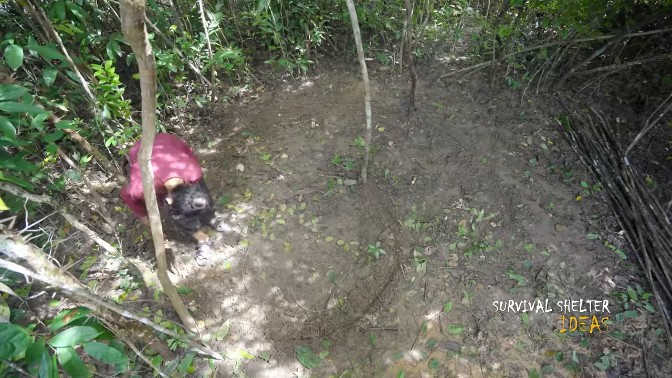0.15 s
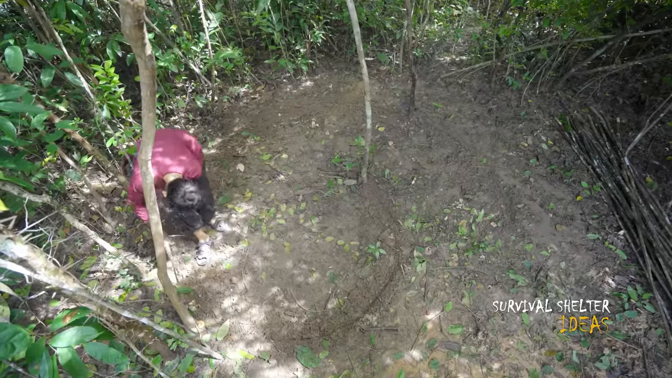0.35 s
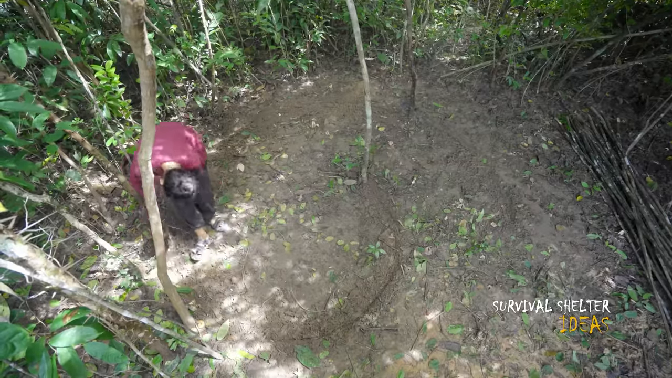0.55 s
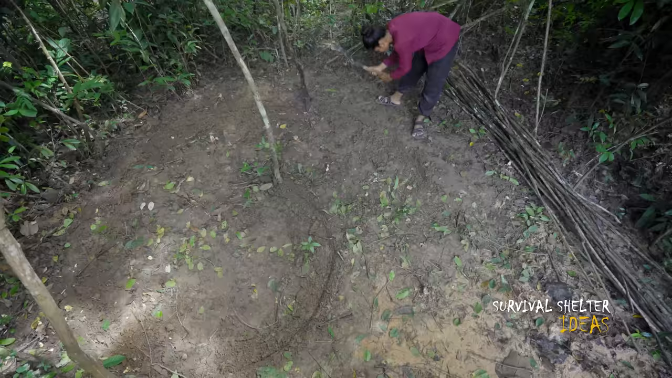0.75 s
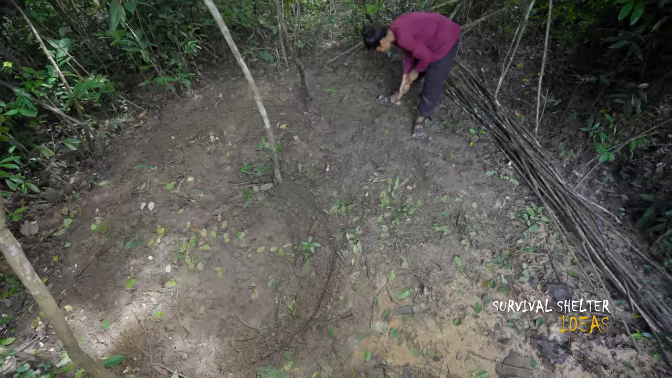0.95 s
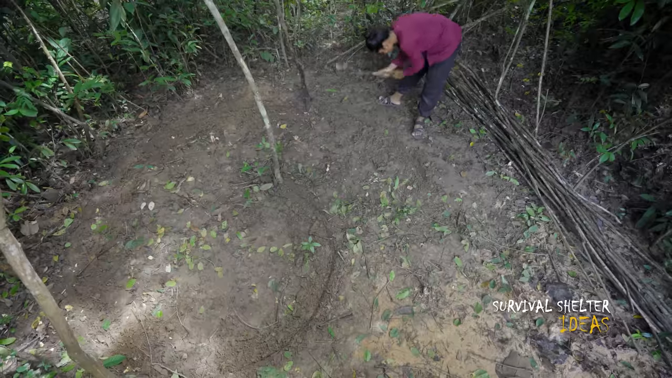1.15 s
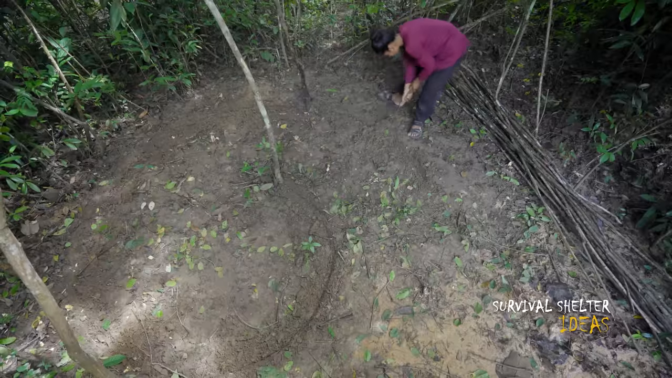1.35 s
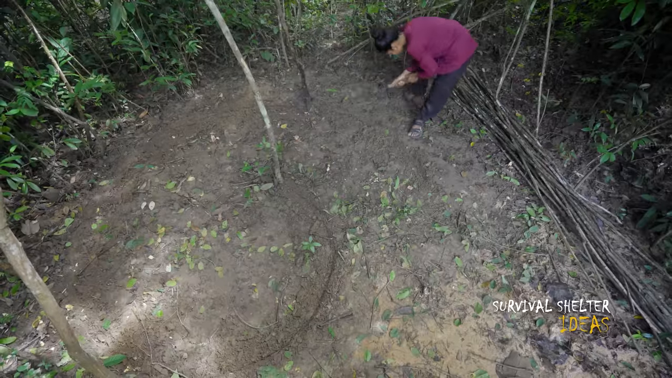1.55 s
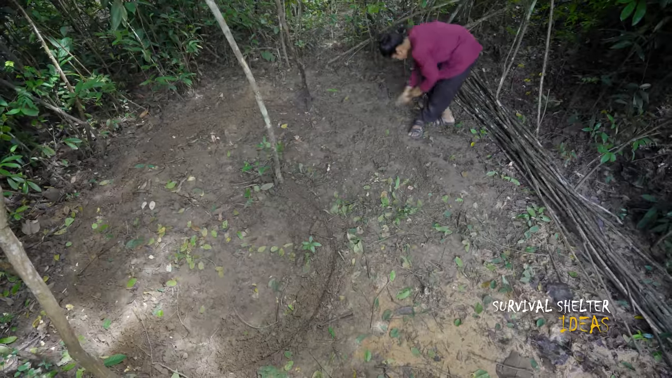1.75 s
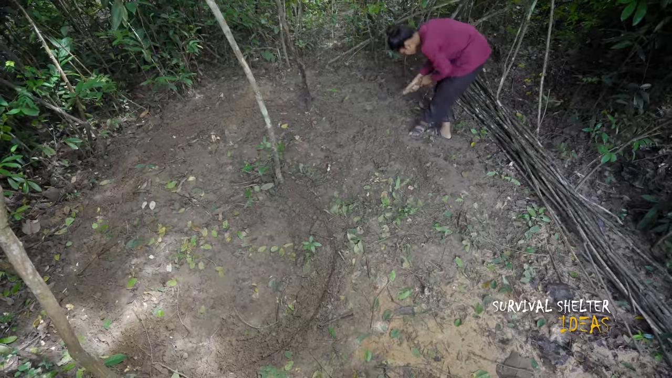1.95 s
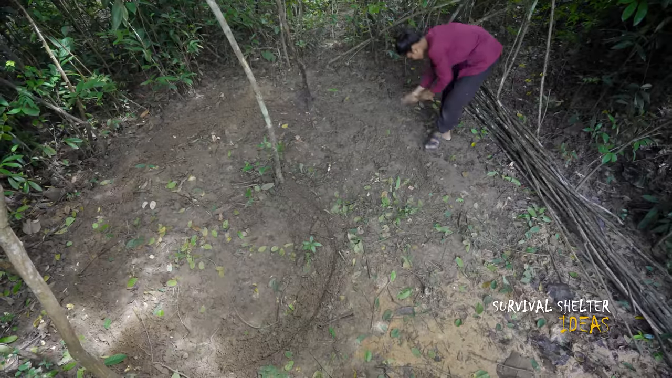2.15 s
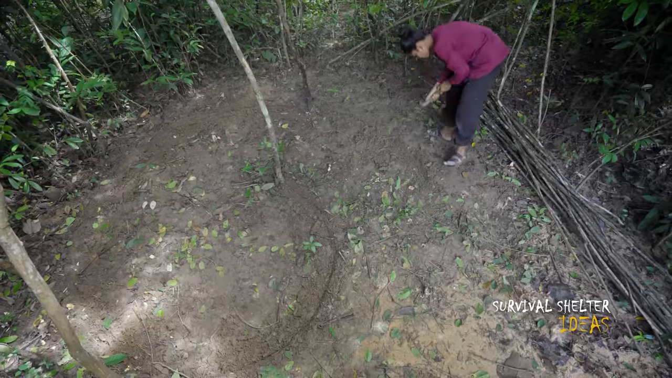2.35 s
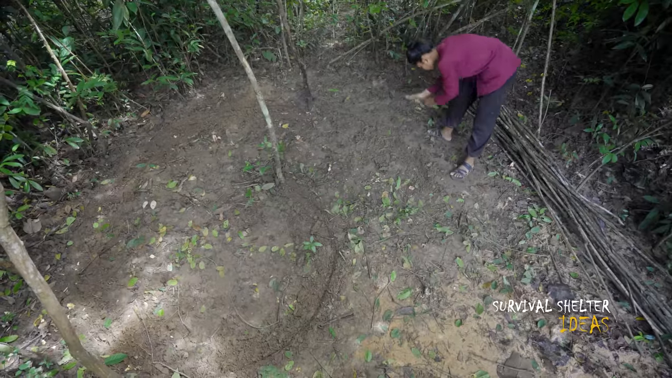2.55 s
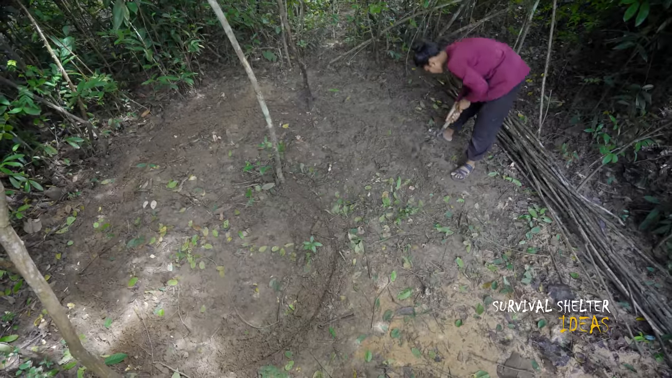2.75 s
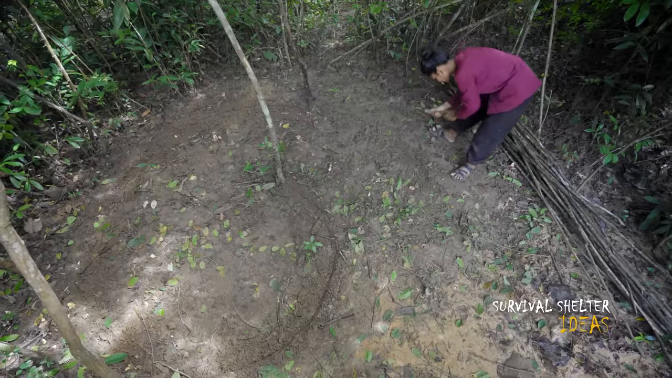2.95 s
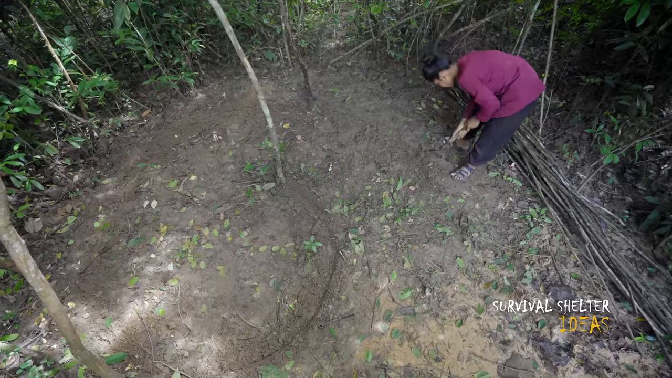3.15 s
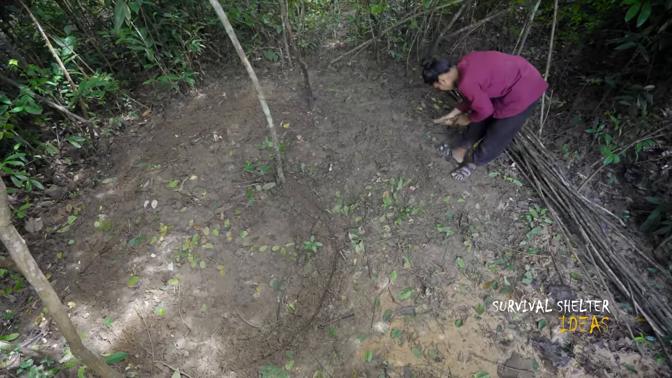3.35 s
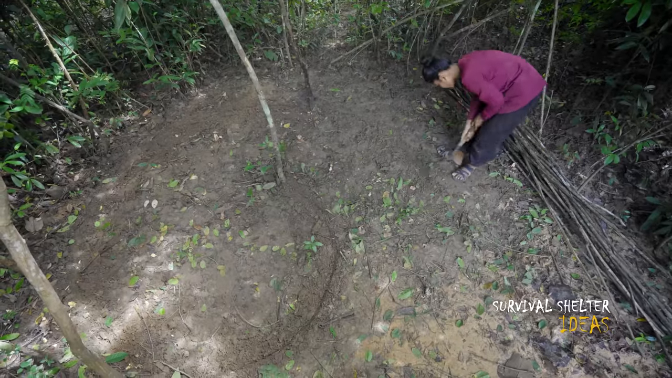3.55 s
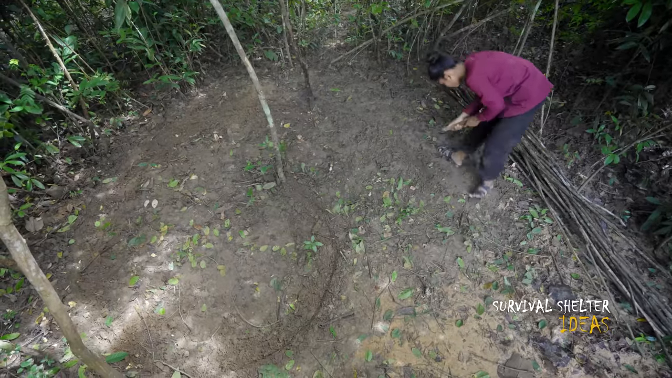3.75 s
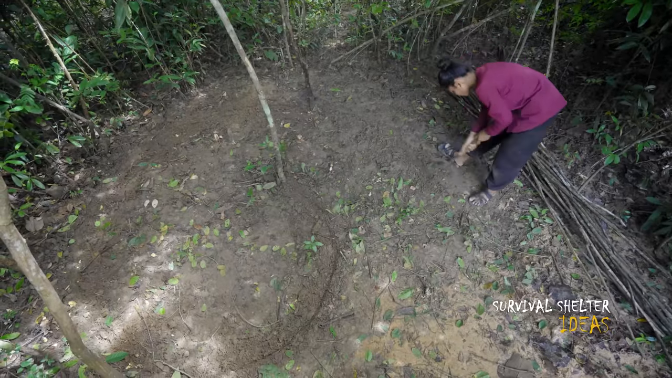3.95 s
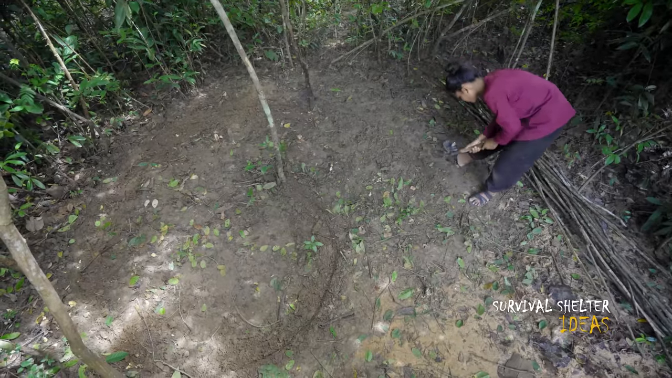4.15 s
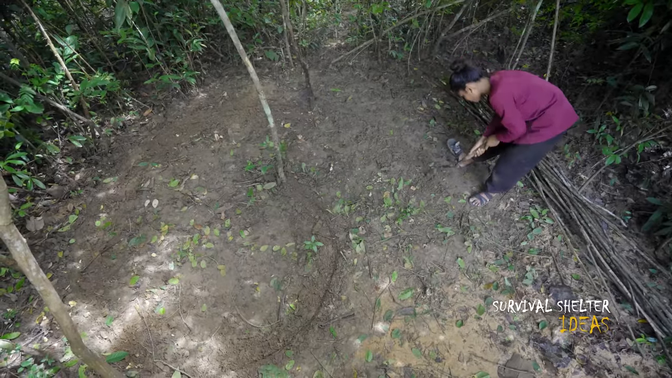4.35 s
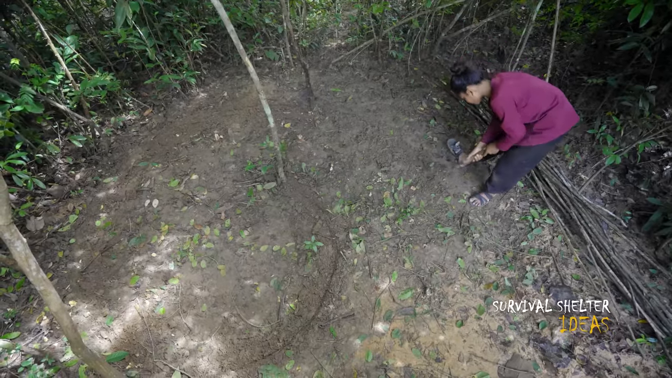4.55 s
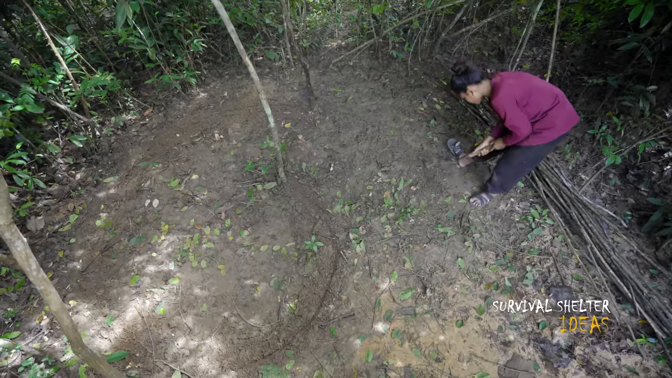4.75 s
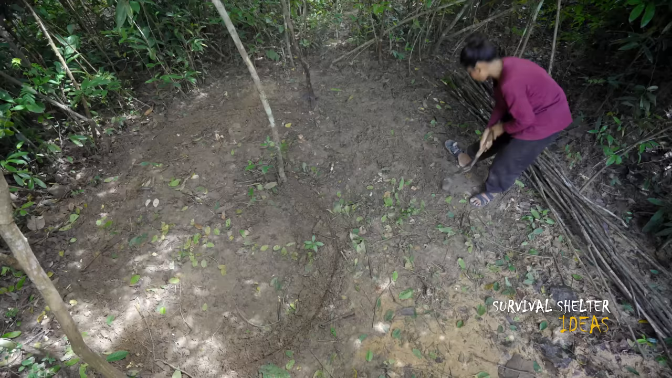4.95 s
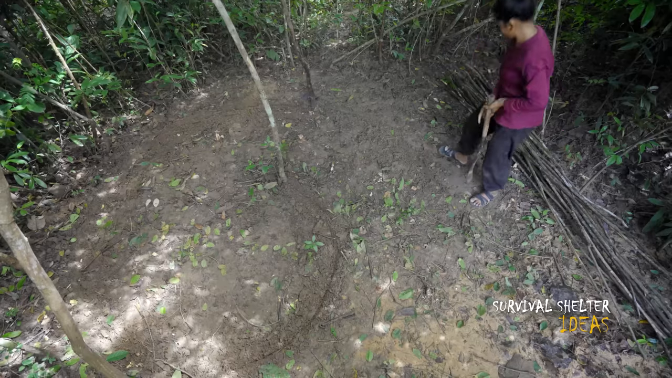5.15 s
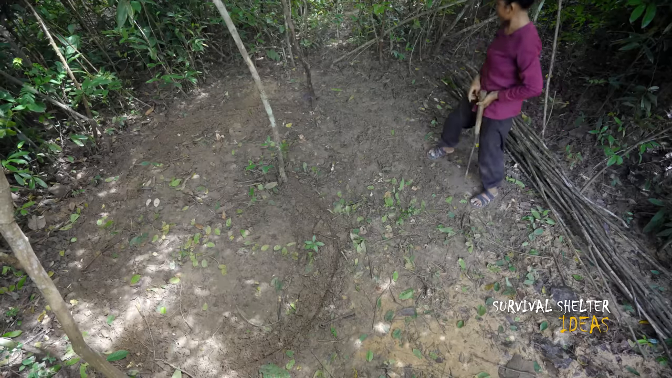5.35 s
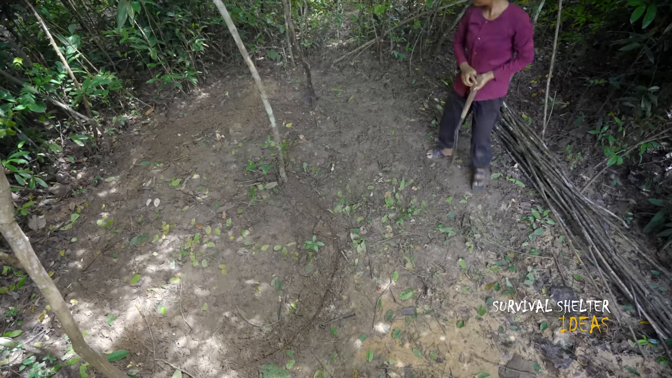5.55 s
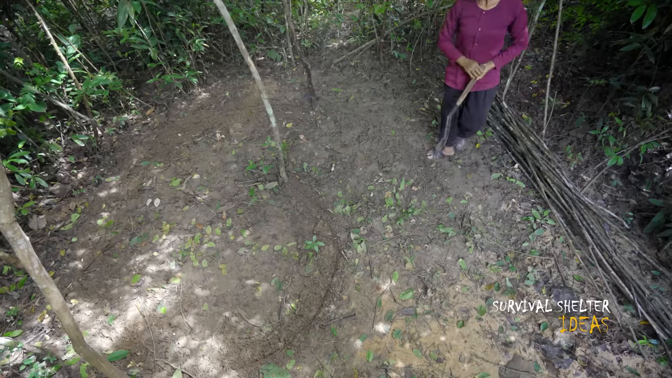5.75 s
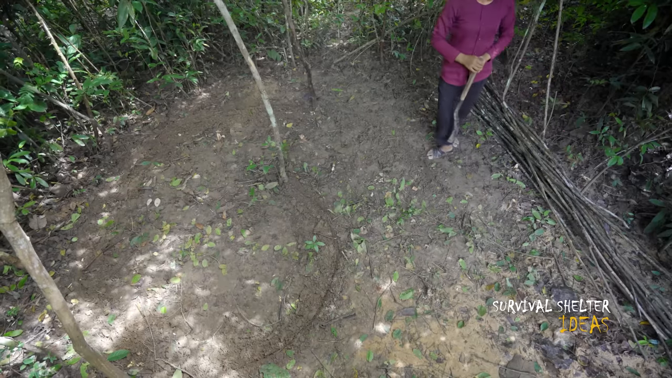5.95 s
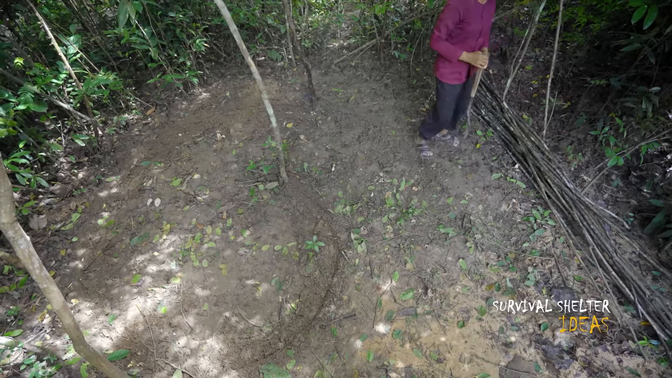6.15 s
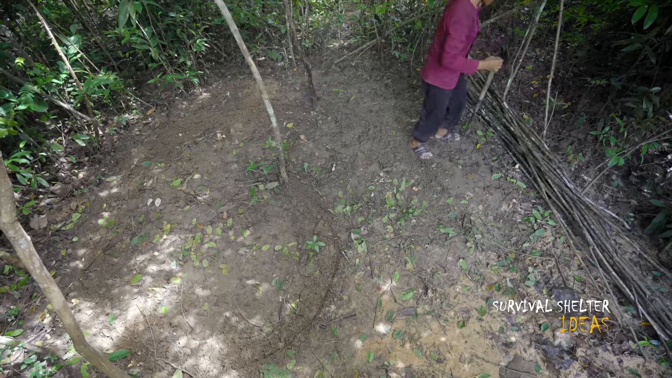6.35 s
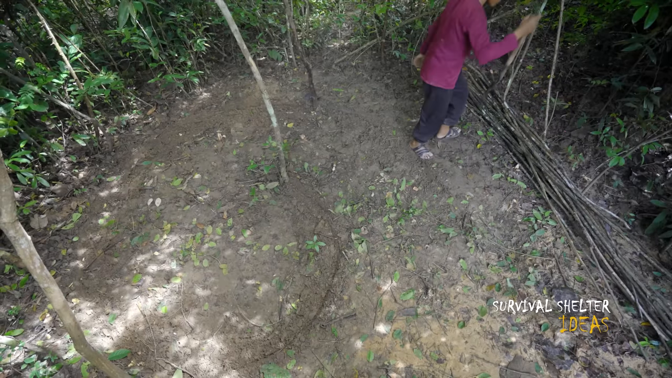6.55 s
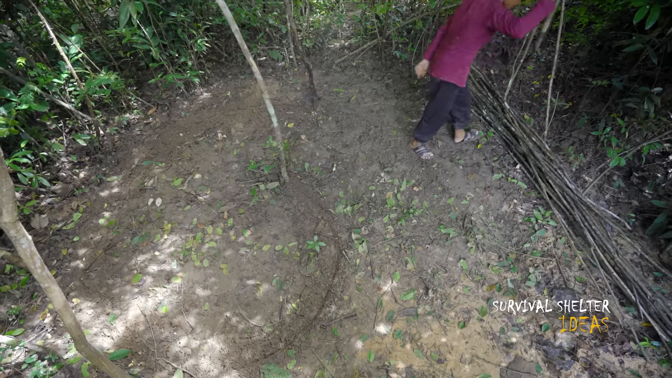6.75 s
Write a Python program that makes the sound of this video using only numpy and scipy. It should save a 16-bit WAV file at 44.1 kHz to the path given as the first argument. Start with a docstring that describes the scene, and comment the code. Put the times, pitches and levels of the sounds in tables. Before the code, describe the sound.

In a forest clearing, a shrill cicada drone near 5.6 kHz swells about five times a second over soft airy hiss and very faint low rumble. At 0.06 s a blade bites dry soil with a cluster of hard stony cracks, slightly left; a softer gritty chop follows at 0.5 s. The hiss drops abruptly just after 0.8 s. From 0.95 to 3.6 s chops land roughly every 0.44 s, each a short crunch of grit and pushed earth, many with dry knocks or brief rings from stones and roots, followed by pattering crumbs. Around 4.0 and 4.4 s the strokes are lighter, then only faint scrapes at 4.65 and 4.93 s. Small leaf and soil rustles occur near 5.4 and 6.5 s, farther left. Trees return a short bright tail; cicadas continue to the end at 6.8 s.

```python
"""In a forest clearing, a machete chops dry soil about twice a second, then more and more lightly.
Each chop is noise for crushed grit, pushed earth and a dull thud; stones and roots crack and ring.
Soil, crumbs and clods patter in shaped noise, and a bright tail of fading noise answers from the trees.
Cicadas are noise near 5.6 kHz, swelling about five times a second over a steady drone.
Beneath are a faint rumble and a forest hiss that drops abruptly after 0.8 s."""
import sys
import numpy as np
from scipy import signal
from scipy.fft import rfft, irfft, next_fast_len
from scipy.io import wavfile
from scipy.ndimage import map_coordinates

SR = 44100
rng = np.random.default_rng(int(sys.argv[2]) if len(sys.argv) > 2 else 0)


def transcribe(signal):
    """Save signal, clipped to [-1, 1], as a 16-bit WAV file at the path in sys.argv[1]."""
    frames = np.atleast_2d(signal).T
    limited = np.clip(frames, -1, 1)
    pcm = np.round(limited * 32767).astype(np.int16)
    wavfile.write(sys.argv[1], SR, pcm)


N = 300762  # length of the scene in samples


def amp(db):
    """Turn decibels into a gain."""
    return 10 ** (np.asarray(db) / 20)


def unit(x):
    """Scale a signal to rms 1."""
    return x / np.sqrt(np.mean(x ** 2) + 1e-20)


def along(points, hz):
    """Read a curve of (Hz, value) points on a logarithmic pitch axis."""
    point_hz, value = np.transpose(points)
    return np.interp(np.log(hz + 1), np.log(point_hz + 1), value)


def over_time(points, s):
    """Read a curve of (seconds, value) points."""
    return np.interp(s, *np.transpose(points))


def wobble(rate, size):
    """Draw a smooth random curve with `rate` random points a second."""
    knots = rng.standard_normal(int(size * rate / SR) + 4)
    return map_coordinates(knots, [np.arange(size) * rate / SR])


def filtered(x, response):
    """Multiply the spectrum of x by a response that depends on frequency."""
    n = x.shape[-1]
    padded = next_fast_len(n + 8192)
    hz = np.fft.rfftfreq(padded, 1 / SR)
    return irfft(rfft(x, padded) * response(hz), padded)[..., :n]


def causal(gain):
    """Give these gains the minimum-phase response, which never sounds before its cause."""
    cepstrum = irfft(np.log(np.maximum(gain, 1e-6)))
    half = len(cepstrum) // 2
    folded = np.r_[cepstrum[0], 2 * cepstrum[1:half], np.zeros(half)]
    return np.exp(rfft(folded))


def noise(spectrum, alike, size):
    """Make stereo noise of rms 1 with a given colour and left-right likeness."""
    def colour(hz):
        turn = np.arccos(np.clip(along(alike, hz), -1, 1)) / 2
        return amp(along(spectrum, hz)) * [np.cos(turn), np.sin(turn)]

    mid, side = filtered(rng.standard_normal((2, size)), colour)
    return unit(np.array([mid + side, mid - side]))


def add(track, s, sound, pan_db):
    """Place a stereo sound at a time; the nearer side is louder and a little earlier."""
    gains = unit(amp([pan_db / 2, -pan_db / 2]))
    left_lag = int(np.clip(np.round(-pan_db / 4), -3, 2))  # samples
    for channel, delay in enumerate((left_lag, 0)):
        start = max(round(s * SR) + delay, 0)
        part = track[channel, start:][:sound.shape[1]]
        part += gains[channel] * sound[channel, :len(part)]


def swell(middle, length):
    """Draw a bell-shaped gain whose power halves length / 2 seconds from its middle."""
    return 2 ** (-2 * ((np.arange(N) / SR - middle) / length) ** 2)


def small(x, corner_hz=300):
    """Thin out the bass, because small things radiate little of it."""
    return signal.sosfilt(signal.butter(2, corner_hz, "high", fs=SR, output="sos"), x)


# where the worker is heard from: time_s, left_minus_right_db
WORKER_PLACE = [(0.1, 5), (0.55, 3), (0.95, -4), (1.4, -4.5), (4.4, -7), (6.82, -8)]


def place(s):
    """Give how much louder the worker is on the left than on the right, in dB."""
    return over_time(WORKER_PLACE, s)


# how loud the forest hiss is: time_s, level_db
HISS_LEVEL = [(0, -41), (0.815, -39.5), (0.835, -49.5), (1.35, -46.5), (1.7, -45.5), (2.5, -44.5),
              (3.3, -43), (4.3, -45), (4.9, -44.5), (5.5, -42.5), (6.82, -43)]
# colour of the hiss: pitch_hz, relative_level_db_per_hz
HISS_COLOUR = [(150, -16.5), (330, -6.5), (500, -10.5), (720, 2), (950, -1), (1400, 2), (2500, 1.5),
               (4500, -0.5), (7500, -3.5), (11000, -6), (13000, -9), (15800, -10.5)]
# colour of the low rumble: pitch_hz, relative_level_db_per_hz
RUMBLE_COLOUR = [(20, -18), (35, -8.5), (60, 3), (80, -0.5), (100, -6), (150, -2), (250, -13), (500, -15),
                 (1500, -30)]
# how alike left and right are for the far sounds: pitch_hz, likeness_0_to_1
FAR_LIKENESS = [(100, 1), (300, 0.89), (700, 0.33), (1400, 0.53), (3100, 0.19), (6800, 0), (15000, 0)]


def forest(rumble_db=-61, pan_db=-1.0):
    """Hiss of the surroundings, noise with a slow level curve, over a faint low rumble."""
    level_db = over_time(HISS_LEVEL, np.arange(N) / SR)
    breeze_db = .4 * wobble(8, size=N)
    hiss = amp(level_db + breeze_db) * noise(HISS_COLOUR, FAR_LIKENESS, size=N)
    rumble = amp(rumble_db) * noise(RUMBLE_COLOUR, FAR_LIKENESS, size=N)
    return hiss * amp([[pan_db / 2], [-pan_db / 2]]) + rumble


# runs of evenly paced cicada swells; two runs overlap where a second cicada joins in:
# first_swell_s, end_s, period_s, level_db (before call_db), swell_length_s
CICADA_RUNS = [(0.213, 0.9, .195, -40.5, .08), (1.081, 1.66, .118, -42, .06), (1.768, 3.1, .207, -39, .09),
               (3.279, 5.06, .213, -38.5, .065), (3.391, 4.25, .2, -40.5, .06),
               (5.153, 6.8, .1875, -38.5, .06)]


def cicada_effort(scatter_db=.7, scatter_s=.005):
    """Evenly paced swells, each a little different in time and strength, add up in power."""
    power = np.zeros(N)
    for first, end, period, db, length in CICADA_RUNS:
        for s in np.arange(first, end, period):
            late, strong = rng.standard_normal(2)
            gain = amp(db + scatter_db * strong)
            power += (gain * swell(s + scatter_s * late, length)) ** 2
    return np.sqrt(power)


# colour of the calling cicadas, before their pitch moves: pitch_hz, relative_level_db_per_hz
CALL_COLOUR = [(3500, -59), (4850, -29), (5200, 0.5), (5600, 8.5), (5950, 5.5), (6350, -2), (7200, -27),
               (10000, -55)]
# colour of the other cicadas: pitch_hz, relative_level_db_per_hz
CHORUS_COLOUR = [(3500, -73), (4900, -6.5), (5400, 5), (5800, 5.5), (6200, -7), (6600, -6.5), (8000, -37)]
# how loud the other, distant cicadas are: time_s, level_db
CHORUS_LEVEL = [(0, -44), (0.8, -46), (1.5, -46.5), (2.6, -55), (3.5, -47), (4.4, -47), (5.3, -44),
                (6.82, -44.5)]


def cicadas(call_db=0.5, sag_hz=260, pan_db=-1.3):
    """One cicada, at times joined by a second, calls in rasping swells, blurred by distance, over a drone."""
    effort = cicada_effort()
    rasp = unit(amp(1.5 * wobble(400, size=N)))
    shift_hz = sag_hz * (1 - unit(effort))  # the pitch sags in each swell, as the abdomen stretches
    # the analytic signal lets a turning phase slide the whole spectrum up or down
    song = signal.hilbert(noise(CALL_COLOUR, FAR_LIKENESS, size=N), next_fast_len(N))[:, :N]
    song = np.real(song * np.exp(2j * np.pi * np.cumsum(shift_hz) / SR))
    callers = amp(call_db) * effort * rasp * song
    chorus_db = over_time(CHORUS_LEVEL, np.arange(N) / SR)
    others = amp(chorus_db) * noise(CHORUS_COLOUR, FAR_LIKENESS, size=N)
    return (callers + others) * amp([[pan_db / 2], [-pan_db / 2]])


# hands and feet shifting soil and dry leaves: middle_s, length_s, level_db
SHIFTS = [(2.092, 0.054, -37.5), (3.12, 0.14, -42.5), (3.279, 0.042, -39), (3.477, 0.029, -42),
          (4.355, 0.02, -36), (5.357, 0.066, -40.5), (5.548, 0.069, -51), (5.673, 0.032, -50),
          (6.47, 0.054, -38.5)]
# colour of crumbs and dry leaves: pitch_hz, relative_level_db_per_hz
LITTER_COLOUR = [(300, -14), (900, -4.5), (2500, 5), (6000, 3.5), (10000, 2.5), (15800, 2)]
# how alike left and right are for the near sounds: pitch_hz, likeness_0_to_1
NEAR_LIKENESS = [(200, 1), (1500, 0.92), (4000, 0.46), (8000, 0.68), (15000, 0.32)]
SPILL_DELAY_S, SPILL_LENGTH_S = 0.074, 0.093  # loosened soil slides off the blade after each chop
STIR_DB = -55  # middle level of the faint stirring of the litter all through


def rustles(crumb_db=5, pan_share=0.89, stir_swing_db=3, clump_db=3.5):
    """Crumbs and dry leaves tick densely under hand, blade and feet: noise in tiny random bursts."""
    spills = [(s + SPILL_DELAY_S, SPILL_LENGTH_S, db) for s, *_, db in CHOP_STROKES]
    stir = amp(STIR_DB + stir_swing_db * np.tanh(wobble(10, size=N)))
    moves = sum((amp(db) * swell(s, length)) ** 2 for s, length, db in SHIFTS + spills)
    motion = np.sqrt(stir ** 2 + moves)
    fine_db = crumb_db * wobble(1200, size=N)
    coarse_db = clump_db * np.tanh(wobble(70, size=N))
    crumbs = unit(amp(fine_db + coarse_db))
    pan_db = pan_share * place(np.arange(N) / SR)
    sides = unit(amp([pan_db / 2, -pan_db / 2]))
    return motion * crumbs * noise(LITTER_COLOUR, NEAR_LIKENESS, size=N) * sides


# hard contacts with stones and roots: start_s, level_db (as 3 ms of sound at that rms),
# note_hz of the thing struck, spread_octaves around it, ring_db of that note against the blow
HARD_CONTACTS = [(0.057, -19, 1920, 1.5, -1.5), (0.0712, -16, 1820, 1.4, 0.5),
                 (0.084, -20.5, 3030, .9, -19), (0.968, -23.5, 1575, 0.81, -8.5),
                 (0.979, -23, 2120, 1.1, -4), (1.135, -35.5, 3500, .55, -9), (1.238, -39, 2200, 1.1, -8),
                 (1.404, -28, 3870, 0.2, 9), (1.410, -24, 1434, 1.2, -3), (1.421, -20, 8850, 1.8, -6),
                 (1.864, -19, 3950, 1.7, -5), (1.957, -33, 4400, 0.65, -5), (2.287, -24, 1450, 1.7, -2),
                 (2.293, -19, 1344, 1.9, -3), (2.724, -18, 1550, 1.35, -18), (2.747, -16, 2590, 0.91, -1.5),
                 (2.752, -20.5, 7400, 1, -9), (3.161, -22.5, 3950, 1.4, -12),
                 (3.585, -17.5, 1250, 3.2, -10), (3.668, -32, 1850, 0.9, -7),
                 (4.051, -21.5, 2597, 0.74, -5), (4.062, -24, 4040, 1, 7), (4.375, -21.5, 4330, 1.3, -2)]
# ringing of the blade damped by soil: pitch_hz, width_hz, relative_level_db (varied at each knock)
BLADE_MODES = [(838, 73, -2.5), (1433, 176, 2.5), (2290, 330, 4), (2960, 630, 14.5), (3940, 68, -4)]
# colour of a hard crack: pitch_hz, relative_level_db_per_hz
CRACK_COLOUR = [(100, -40), (450, -23), (800, -4), (2500, -11.5), (5000, 0), (11000, 2), (15800, -2)]


def knocks(contact_t60=0.0074, blade_db=-6, note_q=24, bite=0.00031):
    """A hard contact cracks, and briefly rings the thing struck and the buried blade."""
    out, t = np.zeros((2, N)), np.arange(SR // 16) / SR
    onset = 1 - np.exp(-t / bite)  # bite in seconds

    def burst(x):  # scaled to the energy of 3 ms at rms 1
        return x * np.sqrt(SR * .003 / np.sum(x ** 2, axis=-1).mean())

    def mode(hz, width):  # a fading sine; the wider, the shorter
        return onset * np.exp(-np.pi * width * t) * np.sin(2 * np.pi * (hz * t + rng.random()))

    for s, db, hz, octaves, ring_db in HARD_CONTACTS:
        crack = noise(CRACK_COLOUR, NEAR_LIKENESS, size=len(t)) * onset * amp(-60 * t / contact_t60)
        blade = sum(amp(level + 2 * rng.normal()) * mode(f, width) for f, width, level in BLADE_MODES)
        body = lambda f: causal(1 / (1 + (np.log2((f + 1) / hz) / octaves) ** 2))
        blow = burst(filtered(burst(crack) + amp(blade_db) * burst(blade), body))
        note = amp(ring_db) * burst(mode(hz, hz / note_q))
        knock = burst(small(blow + note, corner_hz=450))
        add(out, s, amp(db) * knock, place(s))
    return out


# blade through soil; levels are set before the push shapes them and the bass is thinned:
# start_s, length_s, earth_db, grit_db, thud_db, spilled_soil_db (used by rustles)
CHOP_STROKES = [(0.064, 0.02, -21, -29, -50, -36), (0.531, 0.018, -22.5, -23.5, -58, -44),
                (0.956, 0.016, -20.5, -25, -58, -59), (1.398, 0.024, -24, -26, -59, -39),
                (1.851, 0.02, -19.5, -35, -41.5, -39.5), (2.276, 0.019, -20, -24.5, -46.5, -49),
                (2.718, 0.023, -22.5, -36, -50, -49), (3.156, 0.018, -23, -25.5, -50, -48),
                (3.579, 0.0073, -27.5, -23.5, -45, -47), (3.643, 0.027, -34, -35, -65, -63),
                (4.026, 0.035, -30, -26.5, -60, -54), (4.37, 0.0086, -34.5, -26.5, -53, -67),
                (4.655, 0.023, -37.5, -28.5, -56.5, -62), (4.93, 0.053, -41, -30, -64, -48)]
# colour of the pushed earth: pitch_hz, relative_level_db_per_hz
EARTH_COLOUR = [(100, -39), (250, -11.5), (400, -3.5), (520, -13), (780, -1.5), (1400, -1), (2600, 2.5),
                (4500, -3.5), (9000, -2)]
# colour of the crushed grit: pitch_hz, relative_level_db_per_hz
GRIT_COLOUR = [(600, -40), (2000, -2.5), (3800, -2), (6000, -2), (8500, 1), (12000, 1), (14000, -16),
               (15800, -2.5)]
# colour of the dull thud: pitch_hz, relative_level_db_per_hz
THUD_COLOUR = [(30, -17), (75, -11), (140, 0.5), (200, -3.5), (290, -9), (420, -10), (600, -5.5),
               (1500, -52)]
ENTRY_SHARE = .27  # part of a chop spent building up force


def chops(release=0.07, earth_clump_db=3.5, grit_clump_db=0.0):
    """Soil breaks in clumps while the blade advances, and settles when it stops."""
    out, t = np.zeros((2, N)), np.arange(SR // 5) / SR
    for s, length, earth_db, grit_db, thud_db, _ in CHOP_STROKES:
        build_up = np.minimum(t / (ENTRY_SHARE * length), 1)
        settling = amp(-60 * np.maximum(t - length, 0) / release)  # falls 60 dB in release seconds
        push = build_up * settling
        clumps = np.tanh(wobble(1400, size=len(t)))
        earth_clumps = unit(amp(earth_clump_db * clumps))
        grit_clumps = unit(amp(grit_clump_db * clumps))
        earth = amp(earth_db) * earth_clumps * noise(EARTH_COLOUR, NEAR_LIKENESS, size=len(t))
        grit = amp(grit_db) * grit_clumps * noise(GRIT_COLOUR, NEAR_LIKENESS, size=len(t))
        thud = amp(thud_db) * noise(THUD_COLOUR, [(200, 1)], size=len(t))  # same on both sides
        add(out, s, small(push * earth), place(s) / 2)  # lower sounds lean less to one side
        add(out, s, small(push * grit), place(s))
        add(out, s, push * thud, 0)
    return out


CLOD_DELAY_S, CLOD_SCATTER_S = .05, .2  # clods land this long after the chop starts, plus up to this
CLOD_DB, CLOD_HZ = -20, 2720  # middle level against the chop's earth_db, and middle pitch


def clods(t60=0.013, scatter_db=3, scatter_octaves=1.0, count=3):
    """Each chop throws up a few clods, which tick as they land: short bursts of tuned noise."""
    out, t = np.zeros((2, N)), np.arange(SR // 30) / SR
    for s, _, earth_db, *_ in CHOP_STROKES:
        flights = rng.random(count)
        sizes, pitches = rng.standard_normal((2, count))
        for flight, size, pitch in zip(flights, sizes, pitches):
            hz = CLOD_HZ * 2 ** (scatter_octaves * pitch)
            body = lambda f: causal(1 / (1 + np.log2((f + 1) / hz) ** 2))
            crack = noise(CRACK_COLOUR, NEAR_LIKENESS, size=len(t))
            tick = unit(filtered(crack, body)) * amp(-60 * t / t60)
            landing = s + CLOD_DELAY_S + CLOD_SCATTER_S * flight
            add(out, landing, amp(earth_db + CLOD_DB + scatter_db * size) * tick, place(s))
    return out


# how long the tail takes to fall by 60 dB: pitch_hz, time_s
TREES_FADE = [(200, 0.36), (1000, 0.16), (3000, 0.14), (8000, 0.19), (15000, 0.2)]
# how much the trees scatter back, before trees_db: pitch_hz, gain_db
TREES_COLOUR = [(150, -34), (1000, -11.5), (2500, -2.5), (6000, 2), (15000, -1.5)]


def trees(x, build_up=0.014):
    """Trunks and leaves scatter a bright, short tail: fading noise, redrawn every 4/9 s."""
    out = np.zeros((2, N + SR))
    step = SR * 4 // 9
    for start in range(0, N, step):
        hz, t, z = signal.stft(rng.standard_normal((2, SR // 2)), SR, nperseg=256)
        fade = amp(-60 * t / along(TREES_FADE, hz)[:, None])
        rise = 1 - np.exp(-t / build_up)
        tail = signal.istft(z * (fade * rise), SR, nperseg=256)[1]
        tail = tail / np.linalg.norm(tail[0])
        wet = signal.fftconvolve(x[:, start:start + step], tail, axes=1)
        out[:, start:start + wet.shape[1]] += wet
    return filtered(out[:, :N], lambda hz: amp(along(TREES_COLOUR, hz)))


def scene(trees_db=-5, spread=0.25):
    """Add up the forest, the cicadas, the work and its echo from all round."""
    work = rustles() + knocks() + chops() + clods()
    echo = trees(work + spread * work[::-1])  # some of each side leaks into the other
    return forest() + cicadas() + work + amp(trees_db) * echo


TOP_HZ = 15850  # upper limit of the sound


def record(dry):
    """Keep nothing at or above the upper limit."""
    return filtered(dry, lambda hz: hz < TOP_HZ)


dry = scene()
out = record(dry)
transcribe(out)
```